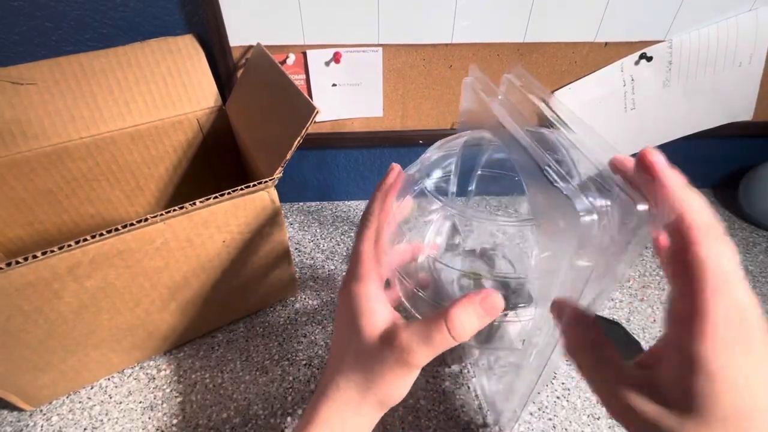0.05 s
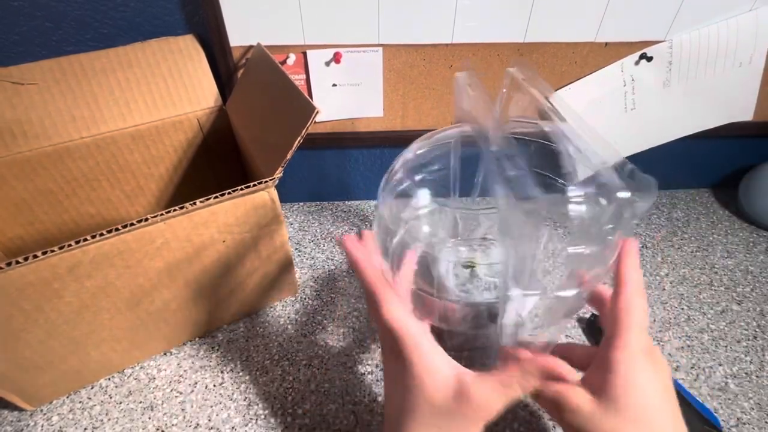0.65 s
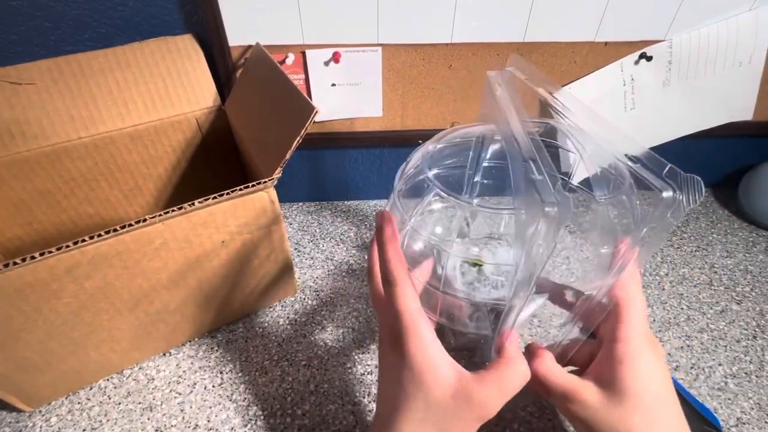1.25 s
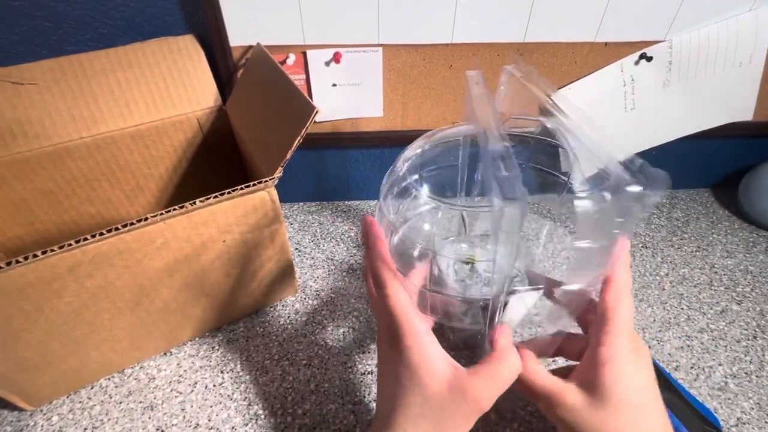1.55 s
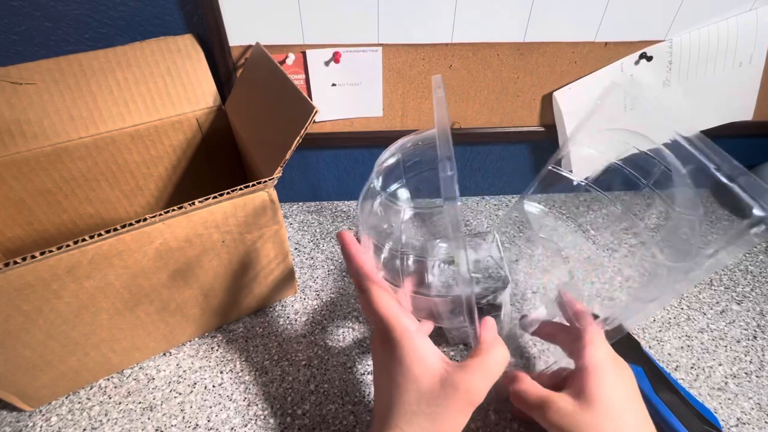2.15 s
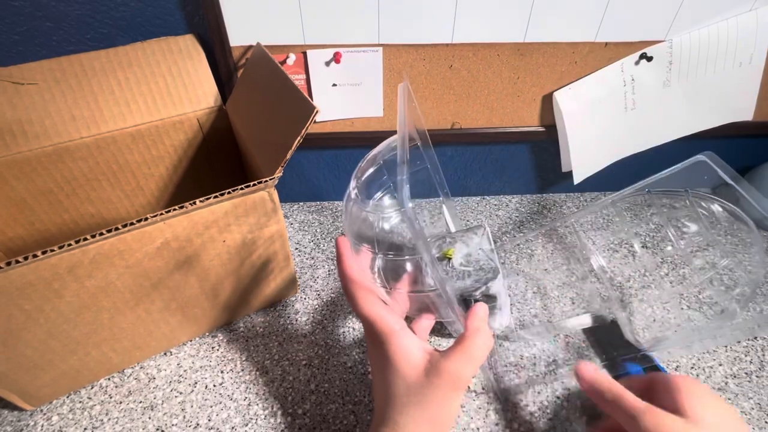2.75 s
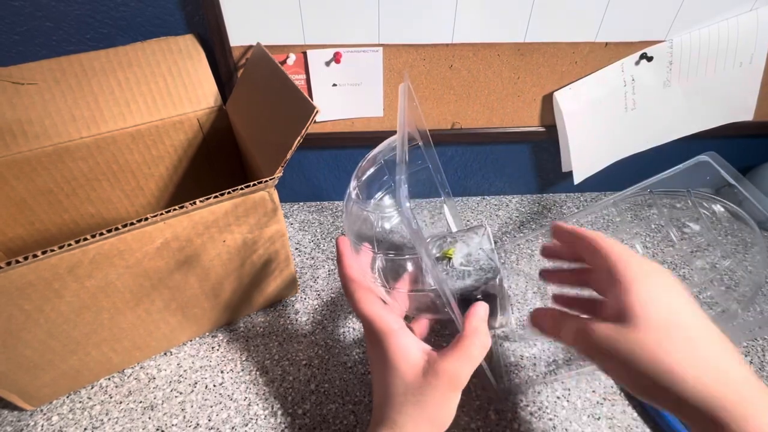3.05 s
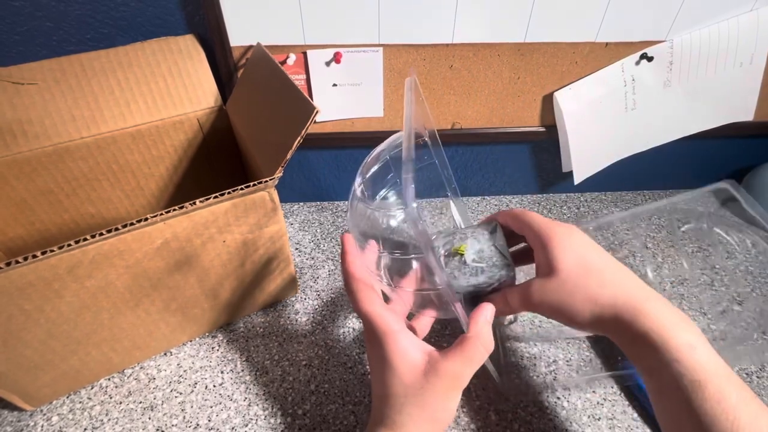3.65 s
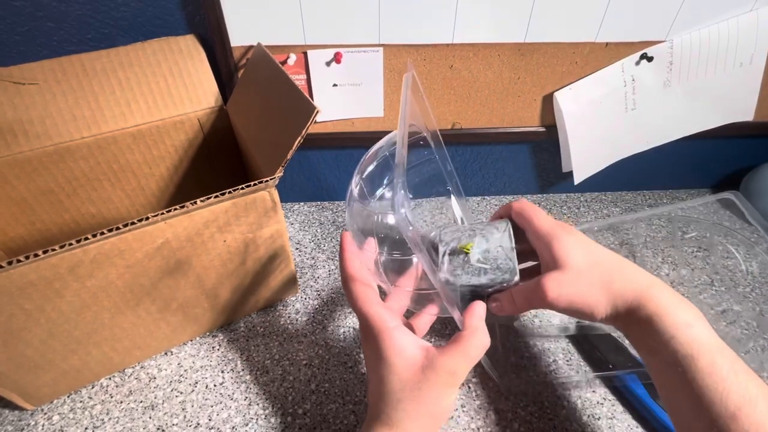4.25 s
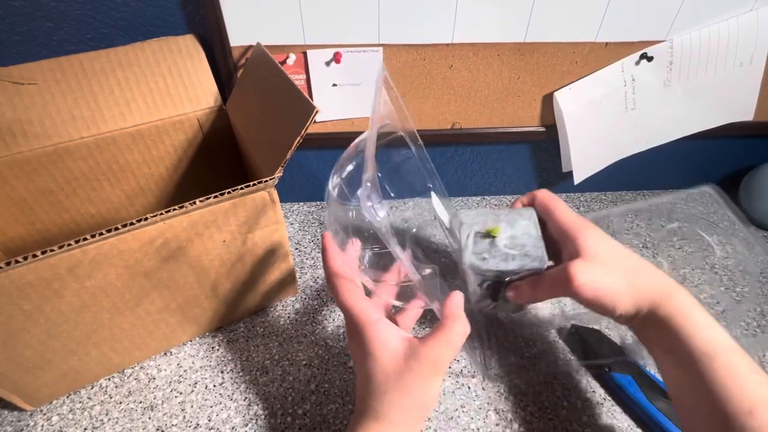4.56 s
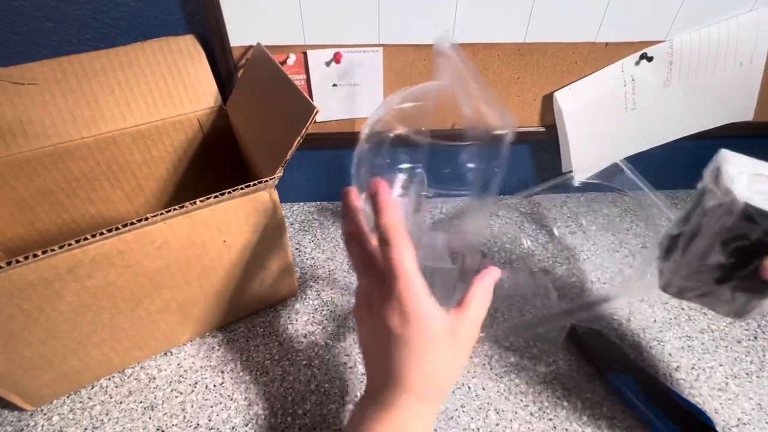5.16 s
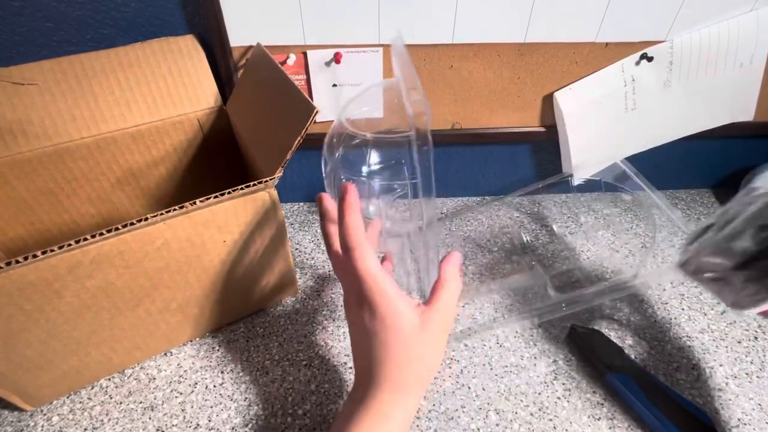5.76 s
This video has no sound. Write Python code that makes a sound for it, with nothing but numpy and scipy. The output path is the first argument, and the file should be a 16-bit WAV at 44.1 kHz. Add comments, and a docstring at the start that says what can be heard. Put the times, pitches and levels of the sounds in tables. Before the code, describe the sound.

Close, irregular clicks and sharp snaps of a rigid plastic pack being pulled open, with hollow pops, rubbing and light desk thuds.

```python
"""A desk in a small room, a stereo microphone pair close in front of a stiff plastic blister pack.
Two hands pry the pack apart and work an object out of it. The thin shell snaps and crackles, a little
left of centre; its dome buckles with hollow pops, and the jolts thud into the desk. Loose edges
chatter. Between the snaps plastic slides over plastic, skin and desk top, and the wall of the pack
groans under the fingers. Behind it all lie a short room echo, faint air and a steady hum."""
import sys
import numpy as np
from scipy import signal
from scipy.fft import rfft, irfft, next_fast_len
from scipy.io import wavfile

SR = 44100
rng = np.random.default_rng(int(sys.argv[2]) if len(sys.argv) > 2 else 0)


def dump_mix(stems):
    """Bounce the given channels to the path in sys.argv[1] as a 16-bit WAV at rate SR."""
    frames = np.atleast_2d(stems).T  # one column per channel
    limited = np.clip(frames, -1, 1)  # hard clip at full scale
    pcm = np.round(limited * 32767).astype(np.int16)
    wavfile.write(sys.argv[1], SR, pcm)


N = 264159


def amp(db):
    """Decibels to gain."""
    return 10 ** (np.asarray(db) / 20)


def unit_rms(x):
    """Scales to rms 1."""
    return x / np.sqrt(np.mean(x ** 2) + 1e-20)


def at_energy(x, db):
    """Gives a short sound the energy of a level db held for 20 ms."""
    return amp(db) * x * np.sqrt(.02 * SR / (np.sum(x ** 2) / len(x) + 1e-20))


def at_hz(points, hz):
    """Reads a curve on a log-frequency axis."""
    freqs, values = np.transpose(points)
    return np.interp(np.log(hz + 1), np.log(freqs), values)


def pan(left_db):
    """Gains at the two microphones, the left louder by left_db."""
    return amp([[left_db / 2], [-left_db / 2]])


def add(mix, start_s, sound):
    """Mixes a sound into both channels."""
    part = mix[:, max(0, round(start_s * SR)):][:, :sound.shape[-1]]
    part += sound[..., :part.shape[1]]


def colour(x, gain, size=4096):
    """Causal filter with the magnitude gain(Hz)."""
    log_gain = np.log(np.maximum(gain(abs(np.fft.fftfreq(size, 1 / SR))), 1e-5))
    taps = np.fft.ifft(np.exp(np.conj(signal.hilbert(log_gain)))).real[:size // 2]
    return signal.oaconvolve(x, taps[None], axes=1)[:, :x.shape[1]]


def equalise(x, spectrum):
    """Filters by a curve of (frequency [Hz], level [dB])."""
    return colour(x, lambda hz: amp(at_hz(spectrum, hz)))


def noise_pair(count, likeness):
    """White noise at the two microphones, with correlation likeness."""
    left, other = rng.standard_normal((2, count))
    return np.array([left, likeness * left + np.sqrt(1 - likeness ** 2) * other])


def delayed(x, delay_s):
    """Delays a channel by a fraction of a millisecond."""
    size = next_fast_len(N + 64)
    shift = np.exp(-2j * np.pi * np.fft.rfftfreq(size, 1 / SR) * delay_s)
    return irfft(rfft(x, size) * shift, size)[:N]


# Still air, nearly alike at both microphones: (frequency [Hz], level [dB])
AIR_SPECTRUM = [(20, -30.5), (36, -28.5), (50, 2), (65, 1), (100, -3), (160, -11), (300, -18), (700, -28),
                (1500, -44.5), (4000, -47.5), (9000, -47), (11500, -50), (13000, -66)]
# Hum in the room, centred: (frequency [Hz], level [dB])
HUM_TONES = [(53, -58.5), (119, -66)]

def room_tone(air_db=-58):
    """Faint low air noise and a steady hum."""
    t = np.arange(N) / SR
    hum = sum(amp(db) * np.sqrt(2) * np.sin(2 * np.pi * (hz * t + rng.random())) for hz, db in HUM_TONES)
    return hum + amp(air_db) * unit_rms(equalise(noise_pair(N, 0.86), AIR_SPECTRUM))


def strokes(rows, skew, sharpness):
    """Gain over time of hand strokes: each speeds up and slows down in one arch."""
    t, power = np.arange(N) / SR, np.zeros(N)
    for start, length, db in rows:
        during = (t > start) & (t < start + length)
        arch = abs(np.sin(np.pi * ((t[during] - start) / length) ** skew)) ** sharpness
        power[during] += (amp(db) * arch) ** 2
    return np.sqrt(power)


def friction(level, spectrum, likeness, grain_db, grain_s):
    """A dense stream of tiny slips that bunch unevenly and follow the hands' movement."""
    t, knots = np.arange(N) / SR, np.arange(0, N / SR + grain_s, grain_s)
    slips = noise_pair(N, likeness)
    bunching = amp(grain_db * np.interp(t, knots, rng.standard_normal(N)[:len(knots)]))
    return level * unit_rms(equalise(slips * bunching, spectrum))


def crinkles(level, spectrum, per_s=30, level_db=-16, spread_db=2.5, decay_s=.003, size=900):
    """Now and then a sliding edge catches and lets go with a tiny tick."""
    strengths = amp(spread_db * np.minimum(rng.exponential(1, N), 3))
    catches = strengths * (rng.random(N) < per_s / SR)
    ticks = np.maximum(signal.oaconvolve(catches, np.exp(-np.arange(size) / SR / decay_s))[:N], 0)
    return level * amp(level_db) * unit_rms(equalise(noise_pair(N, .5) * ticks, spectrum))


# Plastic sliding over plastic, close up: (start [s], length [s], hiss [dB], scrape [dB])
PLASTIC_SLIDES = [(0, 0.14, -57, -55), (0.034, 0.23, -51, -52.5), (0.238, 0.27, -65, -64),
                  (0.413, 0.19, -53.5, -54), (0.563, 0.06, -50, -52), (0.627, 0.11, -57.5, -50.5),
                  (1.186, 0.49, -56.5, -59.5), (1.62, 0.12, -53.5, -48), (1.711, 0.13, -49.5, -53.5),
                  (2.063, 0.22, -61, -87.5), (2.292, 0.24, -53.5, -60.5), (2.42, 0.29, -67.5, -61),
                  (2.715, 0.057, -66.5, -70), (3.099, 0.054, -61.5, -67.5), (3.191, 0.24, -64.5, -86),
                  (3.528, 0.046, -41.5, -37), (3.58, 0.16, -57, -44.5), (3.686, 0.3, -64, -77.5),
                  (3.913, 0.1, -62.5, -48.5), (3.986, 0.22, -50.5, -56.5), (4.201, 0.2, -47.5, -63.5),
                  (4.366, 0.11, -60, -46), (4.547, 0.14, -67, -53.5), (4.773, .17, -60.5, -54.5),
                  (4.956, .13, -62.5, -58.5), (5.233, 0.052, -65.5, -59), (5.305, .13, -72, -56.5),
                  (5.52, 0.066, -65.5, -59), (5.579, 0.083, -69, -55), (5.816, 0.092, -62.5, -82.5)]
# The pack dragging on the desk top: (start [s], length [s], rumble [dB])
DESK_DRAGS = [(.09, 0.11, -42), (.5, 0.12, -50), (1.43, 0.1, -46.5), (1.68, 0.13, -51), (3.52, 0.083, -33),
              (3.62, 0.14, -41), (3.94, 0.1, -51), (4.28, 0.13, -40.5), (4.41, 0.097, -39.5),
              (4.97, 0.13, -48), (5.33, 0.14, -54.5), (5.59, 0.14, -53)]
# Rubbing of fingers that never hold quite still: (time [s], level [dB])
FINGER_RUB = [(0, -57), (.85, -65), (1.4, -58.5), (2.1, -67), (2.65, -62), (2.82, -75), (2.98, -77.5),
              (3.12, -65), (3.35, -62), (3.85, -69), (4.4, -53), (4.72, -59), (5.1, -63.5), (5.7, -61.5),
              (5.99, -67.5)]
# Hiss and scrape, wide across the pair, and rumble, centred: (frequency [Hz], level [dB])
HISS_SPECTRUM = [(900, -3), (1700, -1.5), (3000, -1), (5000, 1), (8000, -0.5), (11700, -3), (12900, -33),
                 (16000, -39)]
SCRAPE_SPECTRUM = [(200, -7), (420, 1), (580, 4), (760, 2), (1000, -2.5), (1600, -10), (2600, -13),
                   (5000, -35.5)]
RUMBLE_SPECTRUM = [(40, -34), (70, -1.5), (110, 3), (170, -3), (260, -7.5), (400, -9), (800, -46.5)]

def sliding(finger_hiss_db=-11, finger_rumble_db=3):
    """Slides give hiss, crinkles and a hollow scrape, drags a rumble; fingers add a little of each."""
    fingers = amp(np.interp(np.arange(N) / SR, *np.transpose(FINGER_RUB)))
    hiss_rows = [(start, length, db) for start, length, db, _ in PLASTIC_SLIDES]
    scrape_rows = [(start, length, db) for start, length, _, db in PLASTIC_SLIDES]
    hiss = np.hypot(strokes(hiss_rows, skew=0.83, sharpness=1.0), fingers * amp(finger_hiss_db))
    scrape = np.hypot(strokes(scrape_rows, skew=0.99, sharpness=0.93), fingers)
    rumble = np.hypot(strokes(DESK_DRAGS, skew=0.55, sharpness=0.94), fingers * amp(finger_rumble_db))
    return (friction(hiss, HISS_SPECTRUM, likeness=0.21, grain_db=3.0, grain_s=0.0031)
            + crinkles(hiss, HISS_SPECTRUM)
            + friction(scrape, SCRAPE_SPECTRUM, likeness=0.048, grain_db=4.0, grain_s=0.014)
            + friction(rumble, RUMBLE_SPECTRUM, likeness=1.0, grain_db=4.5, grain_s=0.02))


# A slip in the stiff sheet: (frequency [Hz], level [dB])
SHEET_SPECTRUM = [(350, -1.5), (600, 4.5), (1000, -1), (1250, -3.5), (1600, -4.5), (2100, -4.5), (2950, -7),
                  (3650, -13.5), (4300, -14.5), (4900, -15), (5900, -16), (6600, -15.5), (7700, -17),
                  (9300, -8), (12000, -15.5), (13500, -24.5), (16000, -30)]
# Bands of a snap, body to tick: (low edge [Hz], high edge [Hz])
BURST_BANDS = [(350, 1000), (1000, 3300), (3700, 7700), (8000, 16000)]
# Balance of those bands: (trim [dB])
BURST_TRIMS = [0.51, 0.68, 0.33, 1]

def rim_slip(db, patch_hz, falloff_db, decay_s, rise_s=.0007, tail_db=-22, tail_s=0.011,
             patch_db=6, patch_width=.45, size=4000):
    """The rim slips: a burst of bending waves, coloured by the resonance of the patch that gives way."""
    out, t = np.zeros((2, size)), np.arange(size) / SR
    for (low_hz, high_hz), trim_db in zip(BURST_BANDS, BURST_TRIMS):
        def band_gain(hz):
            resonance_db = patch_db / (1 + (2 * (hz / patch_hz - 1) / patch_width) ** 2)
            skirts = np.sqrt((1 + (low_hz / (hz + 1)) ** 10) * (1 + (hz / high_hz) ** 10))
            return amp(at_hz(SHEET_SPECTRUM, hz) + resonance_db) / skirts

        centre_hz = np.sqrt(low_hz * high_hz)
        stretch = (5000 / centre_hz) ** 0.31  # low waves come later and last longer
        rise = (1 - np.exp(-t / (rise_s * stretch))) ** 2
        fall = np.exp(-(t / (2 * decay_s * stretch)) ** 0.96) + amp(tail_db) * np.exp(-t / tail_s)
        burst = colour(noise_pair(size, 0.14) * rise * fall, band_gain, size=2048)
        out += at_energy(burst, db + trim_db - falloff_db * abs(np.log2(centre_hz / patch_hz)))
    return out


# Partials of a patch: (pitch [x patch pitch], level against the snap [dB], t60 at reference_hz [s])
PATCH_PARTIALS = [(0.551, -19, .13), (.85, -18.5, 0.12), (1, -12, .11)]

def patch_ring(db, patch_hz, rise_s=0.0016, reference_hz=1800, size=6000):
    """After its snap the patch rings on faintly; small, high patches die sooner."""
    t, phases = np.arange(size) / SR, rng.uniform(0, 2 * np.pi, (len(PATCH_PARTIALS), 2, 1))
    ring = np.zeros((2, size))
    for (ratio, partial_db, t60), phase in zip(PATCH_PARTIALS, phases):
        fall = amp(db + partial_db - 60 * t / t60 * patch_hz / reference_hz)
        ring += fall * np.sin(2 * np.pi * patch_hz * ratio * t + phase)
    return ring * (1 - np.exp(-t / rise_s))


# Modes of the desk right under the pack: (frequency [Hz], level [dB], t60 [s])
DESK_MODES = [(75.6, -6, 0.095), (109.5, -1.5, 0.17), (150, 1.5, 0.034), (191.5, -4, 0.085),
              (235, 1, 0.092), (301, -1.5, 0.068), (405, 0.5, 0.049), (438, -3, 0.06)]

def desk_thud(db, dull_db=0, push_s=0.0026, detune_share=.05, size=12000):
    """A jolt rings the desk, detuned by the hand's weight; a soft jolt rings mainly the low modes."""
    t, ring = np.arange(size) / SR, np.zeros(size)
    for hz, mode_db, t60 in DESK_MODES:
        detune, phase = rng.uniform(-1.06, 1, 2)
        fall = amp(mode_db - dull_db * np.log2(hz) - 60 * t / t60)
        ring += fall * np.sin(2 * np.pi * (hz * (1 + detune_share * detune) * t + phase / 2))
    return at_energy(ring[None] * (1 - np.exp(-t / push_s)) ** 2, db)


# Snaps of the shell, close up and a little left:
# (time [s], level [dB], patch pitch [Hz], fall-off from that pitch [dB/octave], base decay [s])
SHELL_SNAPS = [(0.0865, -22.5, 1564, 1.5, 0.0031), (.22, -42.5, 910, 5.5, 0.0012),
               (0.4629, -48, 1130, 1.5, 0.005), (0.4755, -47.5, 1130, 0.1, 0.011),
               (0.4901, -52.5, 2000, 0.5, 0.004), (0.5238, -51.5, 2000, 0.5, 0.0044),
               (0.5829, -46.5, 920, 3, .0028), (.676, -49, 1800, -2, 0.0031),
               (0.6805, -40.5, 8300, 4.5, 0.00086), (0.8281, -57, 5740, 1, 0.00072),
               (.875, -53.5, 2580, 8, 0.00061), (.986, -47, 3920, 1.5, 0.0021), (1.047, -53, 770, 9, .003),
               (1.123, -47.5, 1713, 13.5, 0.002), (1.163, -50, 845, 7, 0.0017),
               (1.3434, -50, 1600, 3.5, 0.0011), (1.435, -56, 1990, 2.5, 0.00092),
               (1.476, -39.5, 2130, 1, 0.0022), (1.4985, -45.5, 2160, 3, 0.00063),
               (1.5253, -48.5, 2300, 6.5, 0.0021), (1.616, -55.5, 3940, 2, 0.0008),
               (1.657, -57.5, 1640, -2.5, 0.0019), (1.6724, -36, 1600, -0.2, 0.0031),
               (1.861, -61.5, 2400, 2.5, .001), (1.9227, -46, 3330, 14, 0.001),
               (1.974, -59.5, 1550, 5.5, 0.00068), (2.0537, -52.5, 1620, 7.5, 0.00028),
               (2.148, -48, 5200, 3, 0.0012), (2.21, -60, 5730, 2.5, 0.00093),
               (2.309, -65.5, 1990, 0.5, 0.0016), (2.363, -57.5, 1200, 8, 0.0018),
               (2.442, -56.5, 650, 10, .002), (2.476, -66.5, 2700, 0, .0015), (2.49, -49, 930, 13, 0.0026),
               (2.549, -57.5, 560, 9, .002), (2.575, -62, 559, 6, 0.0017), (2.6078, -46, 2200, 3, 0.0012),
               (2.609, -46.5, 10000, 7, 0.00093), (3.1283, -61, 5060, 3, .0023),
               (3.2275, -58, 1180, 3.5, 0.0014), (3.507, -39, 1174, 5.5, 0.0038),
               (3.5334, -39.5, 1480, 5, 0.0028), (3.5513, -30.5, 1082, 8.5, 0.0031),
               (3.559, -39, 2180, 14, 0.004), (3.592, -46, 2050, 16, .003), (3.628, -48, 1500, 7, .002),
               (3.57, -32.5, 3620, 10.5, 0.0014), (3.7326, -40, 1820, 15, 0.002),
               (3.785, -51.5, 5830, 2, 0.001), (3.8757, -41.5, 7400, 10.5, 0.0016),
               (3.9255, -41, 626, 5, 0.0038), (3.9319, -43.5, 2090, 1.5, 0.00099),
               (4.026, -38.5, 1090, 2.5, 0.0075), (4.037, -43, 8750, 6, 0.00058),
               (4.0504, -53, 9000, -2, 0.00058), (4.0857, -41, 6700, 3, 0.0013),
               (4.102, -45, 9000, 3, 0.00069), (4.177, -31, 1110, 4, 0.0017),
               (4.2867, -28, 5370, 0.6, 0.0028), (4.385, -47.5, 1320, 3, 0.0028),
               (4.4218, -48.5, 870, 4, 0.0014), (4.473, -55, 5030, 2.5, 0.0014),
               (4.54, -63.5, 2480, 1.5, .0012), (4.6486, -32, 10000, 10, 0.0012),
               (4.7848, -51, 5600, 8, 0.0088), (4.917, -62.5, 2060, 2, 0.0018),
               (4.961, -58.5, 1560, 4.5, 0.0033), (4.988, -69, 2400, 1, .001), (5.05, -69, 2000, 1.5, .001),
               (5.107, -77.5, 4500, 0.5, .001), (5.178, -57, 1077, 7.5, 0.0015),
               (5.226, -74, 3000, 4.5, .001), (5.252, -64.5, 1790, 2, 0.003),
               (5.307, -60.5, 1400, 4, 0.0017), (5.3764, -52, 1345, 3.5, 0.0082),
               (5.501, -69, 1710, 2, 0.002), (5.547, -66, 2170, 3, 0.0013), (5.579, -50.5, 706, 7, 0.0018),
               (5.633, -62.5, 2250, 7.5, 0.0014), (5.709, -64, 4470, 4, 0.0018),
               (5.8146, -47.5, 6050, 22, .0017), (5.836, -44.5, 8280, 16, 0.0024)]

def snaps(left_db=3.5, recoil_hz=202, recoil_db=2.5, pack_loss_db_per_octave=2.5):
    """Each snap of the shell or click of the dome bursts, rings its patch and recoils into the desk."""
    out = np.zeros((2, N))
    for start, db, patch_hz, falloff_db, decay_s in SHELL_SNAPS + dome_clicks():
        add(out, start, rim_slip(db, patch_hz, falloff_db, decay_s) * pan(left_db))
        add(out, start, patch_ring(db, patch_hz))
        loss_db = (falloff_db + pack_loss_db_per_octave) * np.log2(patch_hz / recoil_hz)
        add(out, start, desk_thud(db + recoil_db - loss_db))
    return out


# Modes of the thin shell: (frequency [Hz], t60 [s], gain [dB])
SHELL_MODES = [(576, 0.15, -3), (744, 0.82, -4), (875, 0.99, -2), (975, 0.14, -3), (1203, 0.061, -2),
               (1363, 0.3, -3.5), (1473, 0.033, -5), (1610, 0.02, -8.5), (1714, 0.04, -10),
               (2140, 0.063, -5.5), (2554, 0.11, -4), (2850, 0.19, -8.5), (3130, 0.18, -2),
               (3860, 0.043, -8), (4770, 0.04, -10), (5640, 0.25, -6), (6320, 0.06, -1)]

def shell_ring(shaking, flex_share=.035, flex_s=.22):
    """The shell's modes ring after whatever shakes it, and drift together as the hands flex the wall."""
    t, knots = np.arange(N) / SR, np.arange(0, N / SR + flex_s, flex_s)
    # resonators running on a wandering clock all bend in pitch together
    clock = np.cumsum(1 + flex_share * np.interp(t, knots, rng.uniform(-1, 1, len(knots))))
    steps = np.arange(int(clock[-1]) + 1)
    drive = np.array([np.interp(steps, clock, side) for side in shaking])
    ring = np.zeros_like(drive)
    for hz, t60, db in SHELL_MODES:
        q = hz * t60 * np.pi / np.log(1000)
        ring += amp(db) * signal.lfilter(*signal.iirpeak(hz, q, SR), drive)
    return np.array([np.interp(clock, steps, side) for side in ring])


# Knocks on the desk top, centred: (time [s], level [dB], dullness [dB/octave])
DESK_KNOCKS = [(0.087, -22.5, 0.5), (.151, -41, 0), (0.532, -44.5, 5.5), (1.165, -44.5, -4),
               (1.455, -37.5, -11.5), (1.6723, -35.5, 8), (1.694, -36.5, -3.5), (1.708, -42, 2),
               (1.768, -45, 8), (3.517, -36, 3.5), (3.535, -34, 1.5), (3.5608, -36, -12),
               (3.572, -32.5, -1), (3.629, -46, -18), (3.643, -33, 14.5), (3.673, -41, 10.5),
               (3.932, -38, 5), (4.056, -35.5, 5), (4.18, -42.5, -0.5), (4.285, -48, 2.5), (4.34, -35, 6),
               (4.393, -35.5, 3), (4.436, -39.5, 4.5), (4.6486, -55, 0), (5.308, -48, 5),
               (5.5801, -47, 1.5)]

def knocks():
    """The pack bumps down on the desk."""
    out = np.zeros((2, N))
    for start, db, dull_db in DESK_KNOCKS:
        add(out, start, desk_thud(db, dull_db))
    return out


# Jolts that ring a whole panel of the pack, to either side of the pair:
# (time [s], left over right [dB], after-ring [dB], modes as (frequency [Hz], level [dB]))
PANEL_JOLTS = [(0.0877, 3.5, -29, [(388, -30), (1190, -27.5), (1520, -25), (1900, -30), (2150, -34),
               (2550, -34.5), (2850, -37), (3250, -34.5), (4200, -38), (5300, -37)]),
               (0.6811, 5, -28, [(165, -50), (870, -42), (1370, -43), (1900, -41.5), (2250, -46),
               (4900, -49.5), (5450, -47), (6750, -43.5), (10600, -41)]), (.987, 4, -55, [(1820, -56),
               (3250, -51), (3800, -51)]), (1.124, -1, -26, [(1150, -58), (1780, -52), (2600, -62)]),
               (1.6739, 5.5, -25, [(170, -35.5), (245, -33.5), (380, -36), (662, -39.5), (1000, -37.5),
               (1490, -35), (1680, -39)]), (3.7329, 1, -30, [(1230, -45), (1500, -46.5), (1820, -43.5),
               (2170, -49.5), (3000, -53)]), (4.178, 4, -33, [(290, -36.5), (460, -36.5), (590, -39),
               (860, -37.5), (1290, -37), (1530, -39.5), (1820, -42.5), (2750, -46.5), (5400, -52)]),
               (4.2873, 2, -27.5, [(190, -35.5), (560, -32), (872, -32.5), (1195, -33), (1825, -33),
               (2580, -31), (2900, -32.5), (3100, -34), (4330, -35.5), (4850, -34.5), (5300, -36),
               (6650, -32.5), (7300, -32.5), (8500, -27.5), (9000, -29), (9500, -27), (10800, -28)]),
               (4.385, 0, -24, [(1380, -46), (4600, -53)]), (4.423, -4, -33, [(560, -59), (700, -43.5),
               (850, -53)]), (4.786, 0, -20, [(4500, -62), (5300, -58.5), (6500, -62)]),
               (4.967, 2, -24, [(430, -52), (660, -51)]), (5.311, -6, -30, [(420, -54), (580, -52.5),
               (720, -45)]), (5.583, -6, -24, [(430, -53), (600, -47), (745, -42)])]

def panels(width_at_1khz_hz=72, ring_t60=0.13, ring_top_hz=6500, cluster_share=.03, count=5,
           rise_cycles=.5, rise_s=0.00035, skew_rad=0.33, size=8000):
    """A panel rings in broad modes: the hands damp most of it at once, a faint beating cluster stays."""
    out, t = np.zeros((2, N)), np.arange(size) / SR
    for start, left_db, ring_db, modes in PANEL_JOLTS:
        for hz, db in modes:
            width_hz = width_at_1khz_hz * (hz / 1000) ** 0.39
            detune, offset = rng.uniform(-1, 1, (2, count, 1))
            beats = np.exp(1j * np.pi * (2 * hz * cluster_share * detune * t + offset))
            cluster = beats.sum(0) / np.sqrt(count)
            after_ring = cluster * amp(ring_db - 60 * t / ring_t60) / (1 + (hz / ring_top_hz) ** 10)
            rise = (1 - np.exp(-t / (rise_s + rise_cycles / hz))) ** 2
            fall = np.exp(-np.pi * width_hz * t) + after_ring
            phase = rng.uniform(0, 2 * np.pi) + skew_rad * rng.standard_normal((2, 1))
            mode = rise * (fall * np.exp(1j * (2 * np.pi * hz * t + phase))).real
            add(out, start, at_energy(mode, db) * pan(left_db))
    return out


# Pops of the dome, close up: (time [s], level [dB], resting pitch [Hz], time scale of the swell [s])
DOME_POPS = [(0.0884, -9, 560.6, 0.012), (.113, -24.5, 580, 0.0061), (.152, -29, 586, 0.0057),
             (.454, -32.5, 600, 0.01), (0.878, -45, 544, 0.0083), (0.986, -36, 540, 0.0077),
             (1.047, -37.5, 540, 0.0084), (1.127, -43.5, 600, 0.0079), (1.164, -32, 534, 0.0058),
             (1.415, -32.5, 620, 0.001), (1.4525, -19, 545, 0.0098), (1.529, -36.5, 560, 0.0039),
             (3.373, -48.5, 583, 0.0072), (3.627, -29, 616, 0.0067), (4.341, -33, 680, 0.0055),
             (5.375, -45, 885, 0.0093)]
# Where the dome sits between the microphones: (time [s], left over right [dB])
DOME_POSITION = [(0, -3.5), (1.4, 0), (3.6, -1.5)]

def dome_pops(bend_share=0.18, bend_per_power=10.5, settle_s=0.0036, overtone_ratio=1.5, overtone_db=-15,
              right_lead_rad=0.99, rise=0.33, hold=1.6, grip=6, ring_db=-22, ring_t60=.11, size=6000):
    """The dome buckles: its tone swells, sinks to rest and is cut to a faint ring by the grip."""
    out, t = np.zeros((2, N)), np.arange(size) / SR
    for start, db, rest_hz, swell_s in DOME_POPS:
        bend = bend_share + bend_per_power * amp(db) ** 2  # harder pops start higher
        pitch_hz = rest_hz * (1 + bend * np.exp(-t / settle_s))
        phase = 2 * np.pi * np.cumsum(pitch_hz) / SR + np.array([[0], [right_lead_rad]])
        tone = np.sin(phase) + amp(overtone_db) * np.sin(overtone_ratio * phase)
        progress = t / swell_s
        swell = (1 - np.exp(-progress / rise)) * np.exp(-(progress / hold) ** grip)
        ring = np.minimum(progress, 1) * amp(ring_db - 60 * t / ring_t60)
        left_db = np.interp(start, *np.transpose(DOME_POSITION))
        add(out, start, amp(db) * (swell + ring) * tone * pan(left_db))
    return out


def dome_clicks(against_pop_db=-12.5, patch_hz=816, falloff_db=10, decay_s=0.0052):
    """Every pop starts with a dull click, given here as a row for snaps()."""
    return [(start, db + against_pop_db, patch_hz, falloff_db, decay_s) for start, db, *_ in DOME_POPS]


# Spells of a loose edge on the shell, centred: (start [s], length [s], touch level [dB],
# fade over the spell [dB], lowest pitch [Hz], highest pitch [Hz], touches [1/s])
CHATTER_SPELLS = [(.108, 0.13, -49.5, 18.5, 1180, 5900, 202), (0.688, .1, -60.5, 15, 1200, 4040, 304),
                  (1.689, 0.11, -58, 5, 600, 5070, 173), (2.32, .19, -71, 1.5, 1500, 6000, 110),
                  (2.36, 0.23, -64.5, 3, 495, 1800, 101), (4.297, 0.17, -49, 21, 2480, 6600, 320),
                  (4.7, 0.98, -65, 2.5, 500, 1585, 25)]

def edge_chatter(decay_cycles=4.1, spread_db=4, max_touches=64, size=1200):
    """A loose edge chatters unevenly; every touch rings four modes of a different small patch."""
    out, t = np.zeros((2, N)), np.arange(size) / SR
    for start, length, db, fade_db, low_hz, high_hz, per_s in CHATTER_SPELLS:
        times = np.cumsum(rng.exponential(1, max_touches)) / per_s
        scatter_db = spread_db * np.clip(rng.standard_normal(max_touches), -2, 2)
        levels = db - fade_db * times / length + scatter_db
        pitches = low_hz * (high_hz / low_hz) ** rng.random((max_touches, 4, 1, 1))
        shared_phases = 2 * np.pi * rng.random((max_touches, 4, 1, 1))
        phases = shared_phases + .5 * rng.standard_normal((max_touches, 4, 2, 1))
        for when, touch_db, hz, phase in zip(times[times < length], levels, pitches, phases):
            envelope = np.exp(-hz * t / decay_cycles) * (1 - np.exp(-hz * t))
            touch = (envelope * np.sin(2 * np.pi * hz * t + phase)).sum(0)
            add(out, start + when, at_energy(touch, touch_db))
    return out


# Groans and squeaks of the pack's wall, near the centre:
# (start [s], length [s], level [dB], first nominal pitch [Hz], last nominal pitch [Hz], overtones [dB])
WALL_GROANS = [(0.462, 0.035, -40.5, 1150, 1008, -6), (3.625, 0.079, -44.5, 840, 797, -20),
               (4.419, 0.084, -52.5, 720, 765, -9), (4.565, 0.19, -54, 700, 772, -23),
               (4.764, .16, -60, 740, 713, -15), (4.963, 0.12, -55.5, 720, 765, -23)]
# Overtones of a groan: (pitch [x nominal pitch], level against the groan's overtone level [dB])
WALL_OVERTONES = [(1.579, -2), (2.101, -7), (3.1, -12)]

def groans(width_hz=125, likeness=0.79, fundamental_ratio=0.97):
    """A finger sticks and slips on the wall; the resonance it feeds slides as the wall bends."""
    out, lowpass = np.zeros((2, N)), signal.butter(2, width_hz / 2, fs=SR)
    for start, length, db, first_hz, last_hz, overtone_db in WALL_GROANS:
        progress = np.arange(0, length, 1 / SR) / length
        phase = 2 * np.pi * np.cumsum(first_hz + (last_hz - first_hz) * progress) / SR
        arch = np.sqrt(np.sin(np.pi * progress))
        overtones = [(ratio, overtone_db + drop_db) for ratio, drop_db in WALL_OVERTONES]
        for ratio, partial_db in [(fundamental_ratio, 0)] + overtones:
            noise = noise_pair(SR // 2, likeness) + 1j * noise_pair(SR // 2, likeness)
            slips = signal.lfilter(*lowpass, noise)[:, -len(progress):]
            partial = (slips * np.exp(1j * ratio * phase)).real
            add(out, start, amp(db + partial_db) * unit_rms(arch * partial))
    return out


# Decay of the small room: (frequency [Hz], t60 [s])
ROOM_DECAY = [(100, 0.27), (500, 0.19), (2000, 0.28), (6000, 0.18), (12000, 0.27)]
# Colour of its echo at the microphones: (frequency [Hz], level [dB])
ECHO_SPECTRUM = [(100, -1.5), (500, -1.5), (1500, -8), (4000, -7), (7500, -2.5), (10000, -16),
                 (12000, -22.5), (16000, -25)]

def room_echo(x, gap_s=0.004, build_s=0.0013, likeness=0.12, size=22050):
    """Desk and near wall answer within milliseconds; each band then dies at its own speed."""
    hz, t, bands = signal.stft(noise_pair(size, likeness), SR, nperseg=256)
    tail = signal.istft(bands * amp(-60 * t / at_hz(ROOM_DECAY, hz)[:, None]), SR, nperseg=256)[1]
    since_gap_s = np.maximum(np.arange(tail.shape[1]) / SR - gap_s, 0)
    tail = tail * (1 - np.exp(-since_gap_s / build_s))
    tail = equalise(tail / np.linalg.norm(tail[0]), ECHO_SPECTRUM)
    return signal.fftconvolve(x, tail, axes=1)[:, :N]


def scene(snap_room_db=-2, pop_room_db=-5, slide_room_db=-4, right_late_s=.00003):
    """The pack close in front, a little nearer the left microphone, and the small room around it."""
    left, right = snaps() + panels() + edge_chatter() + knocks()
    cracks = np.array([left, delayed(right, right_late_s)])
    dome = dome_pops()
    rub = sliding() + groans()
    echo = room_echo(amp(snap_room_db) * cracks + amp(pop_room_db) * dome + amp(slide_room_db) * rub)
    return cracks + dome + rub + shell_ring(cracks + rub) + echo + room_tone()


# Response of the microphone pair, falling steeply above 12 kHz: (frequency [Hz], level [dB])
MIC_RESPONSE = [(20, 1.5), (9000, -3), (11300, -1.5), (12100, -7), (13000, -24.5), (16000, -21.5)]

def record(dry, port_hz=10150, port_width_hz=1400, port_db=9, notch=0.87, low_hz=42, top_hz=16200):
    """The two microphone ports ring and swing against each other; deep bass and top treble are cut."""
    port = signal.iirpeak(port_hz, port_hz / port_width_hz, SR)
    swing = amp(port_db) * signal.lfilter(*port, signal.lfilter(*port, dry.mean(0)))
    notched = dry - notch * signal.lfilter(*port, dry)
    heard = equalise(notched + np.array([swing, -swing]), MIC_RESPONSE)
    heard = signal.sosfilt(signal.butter(4, low_hz, "high", fs=SR, output="sos"), heard)
    lowpass = signal.firwin(255, top_hz, window=("kaiser", 9), fs=SR)
    return signal.oaconvolve(heard, lowpass[None], "same", axes=1)


dry = scene()
out = record(dry)
dump_mix(out)
```